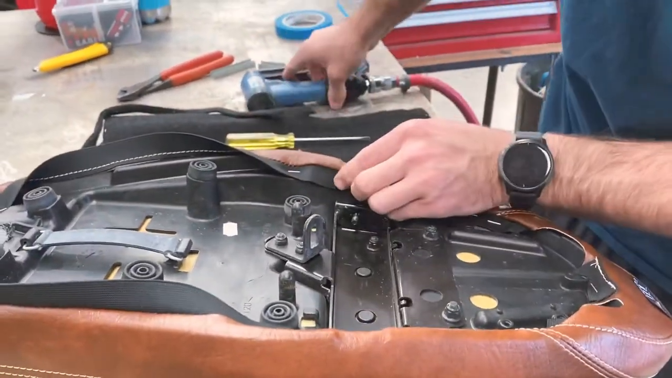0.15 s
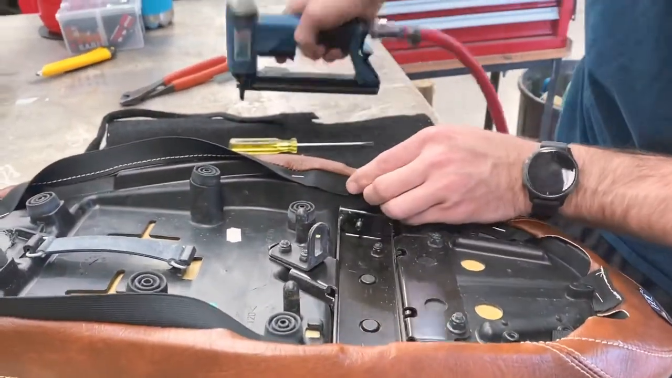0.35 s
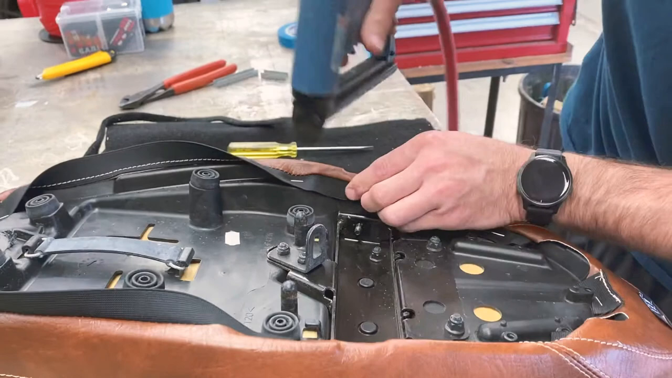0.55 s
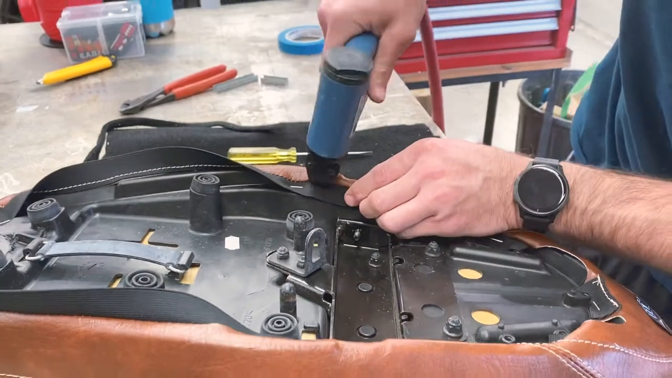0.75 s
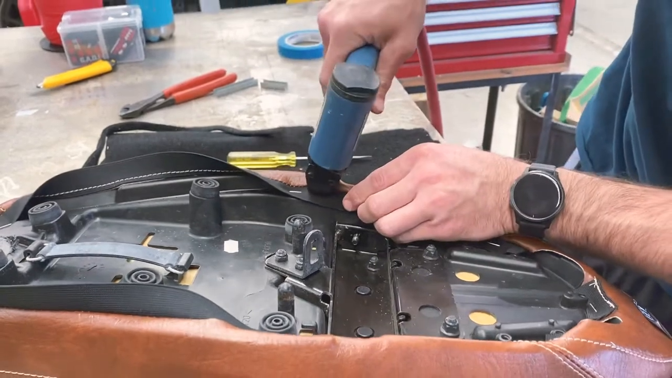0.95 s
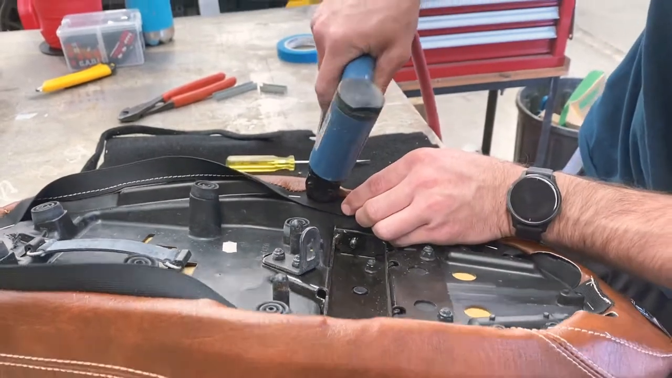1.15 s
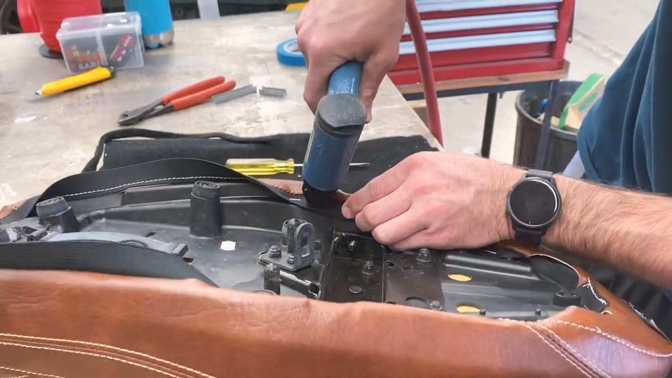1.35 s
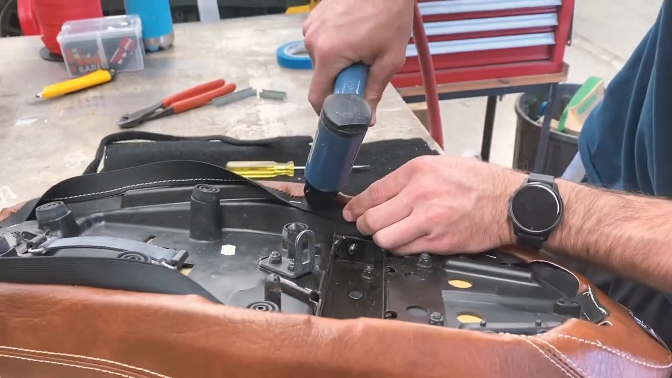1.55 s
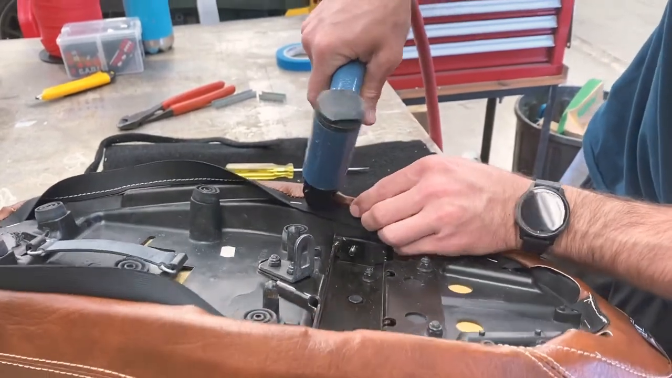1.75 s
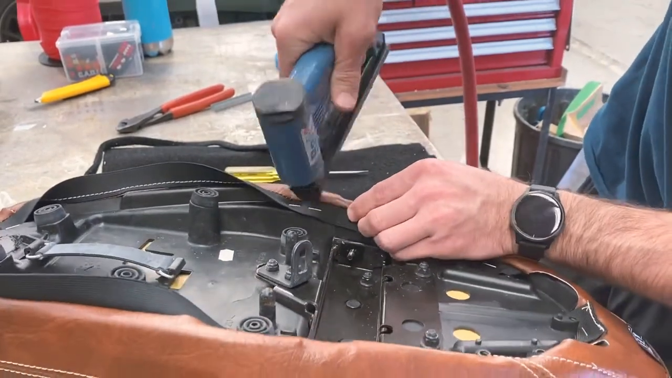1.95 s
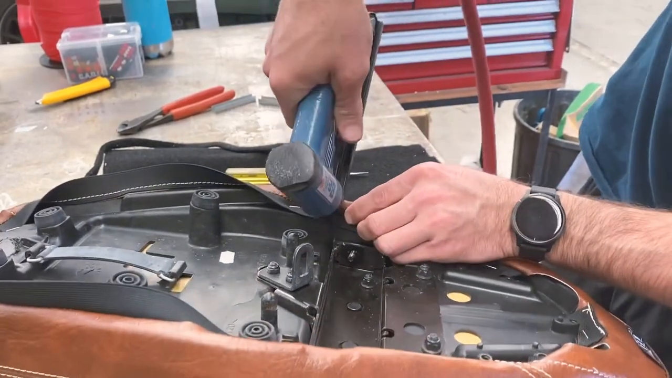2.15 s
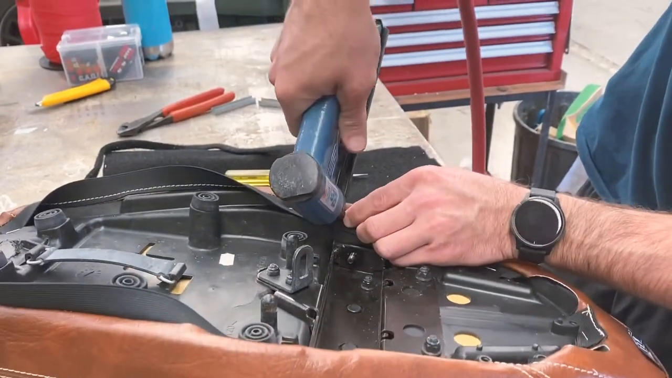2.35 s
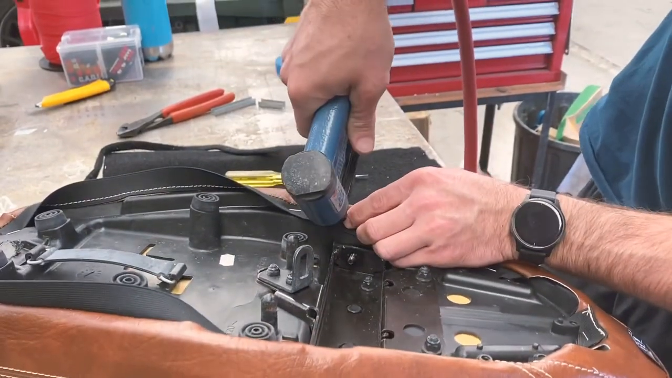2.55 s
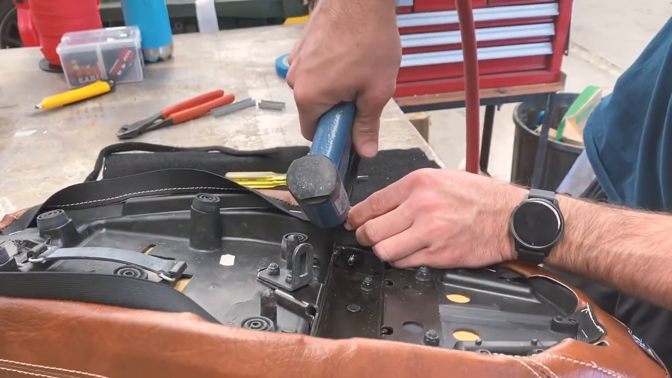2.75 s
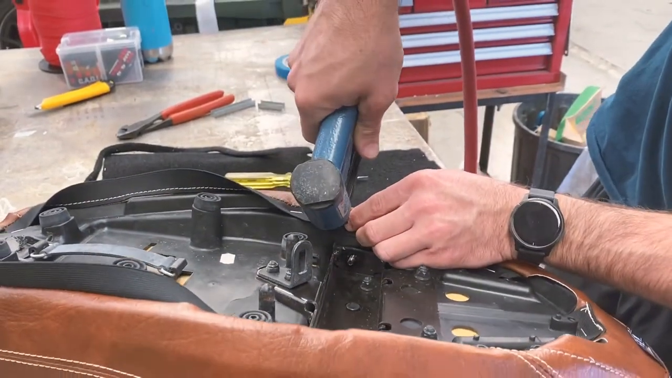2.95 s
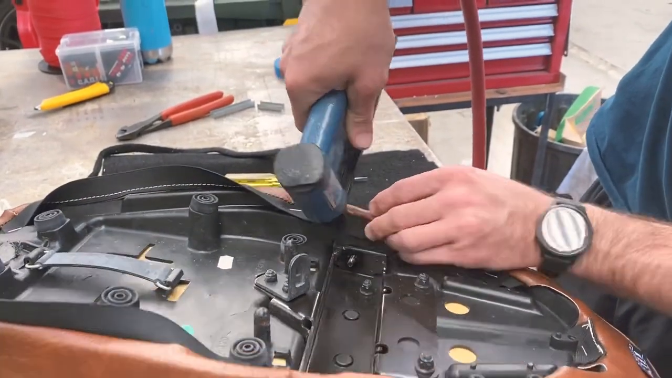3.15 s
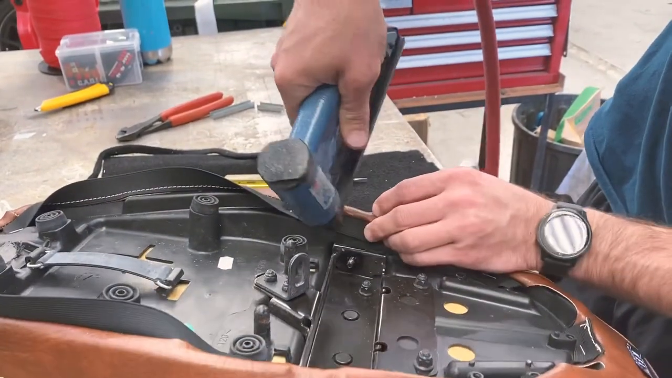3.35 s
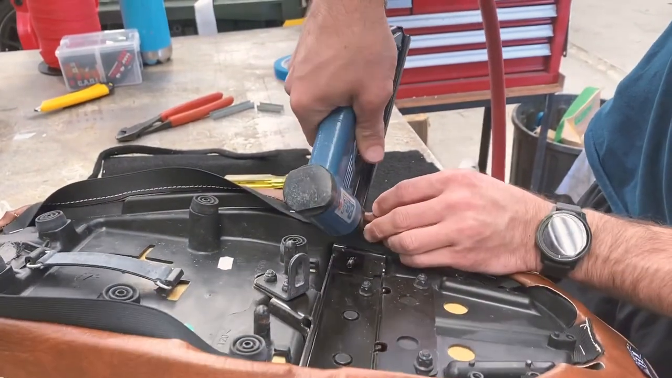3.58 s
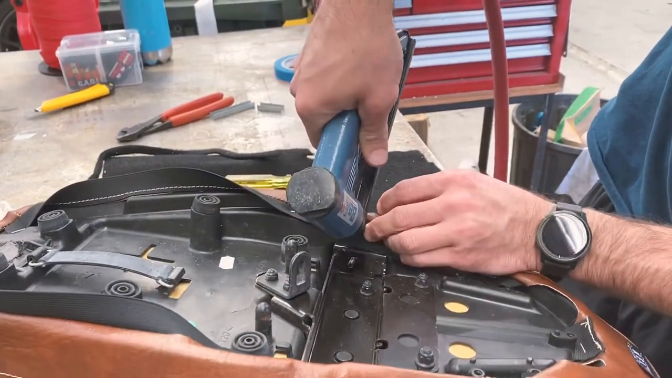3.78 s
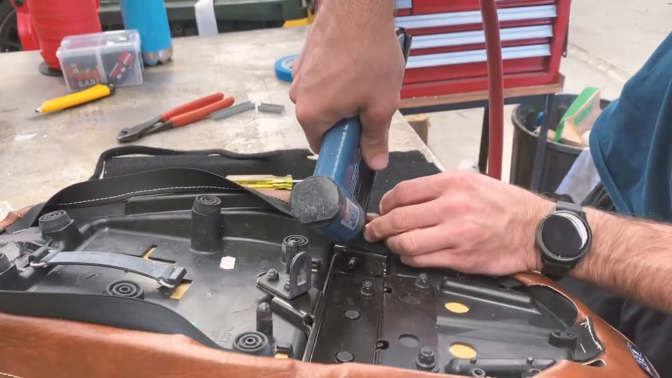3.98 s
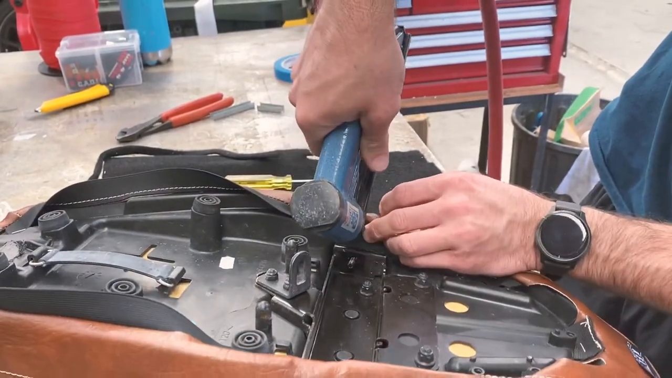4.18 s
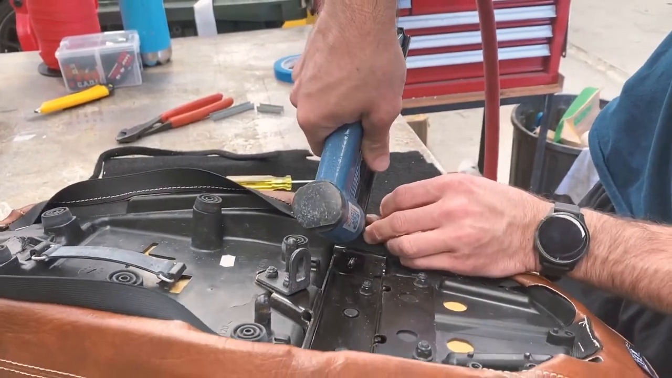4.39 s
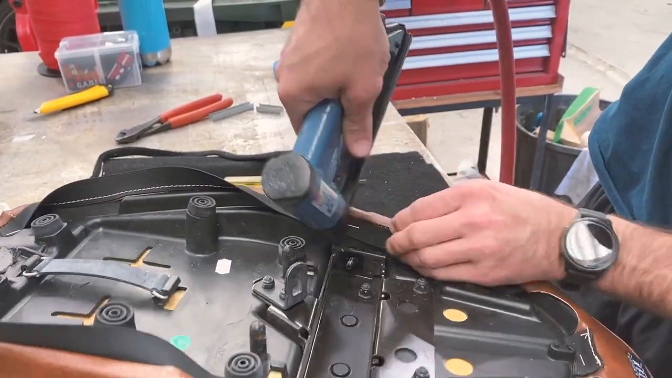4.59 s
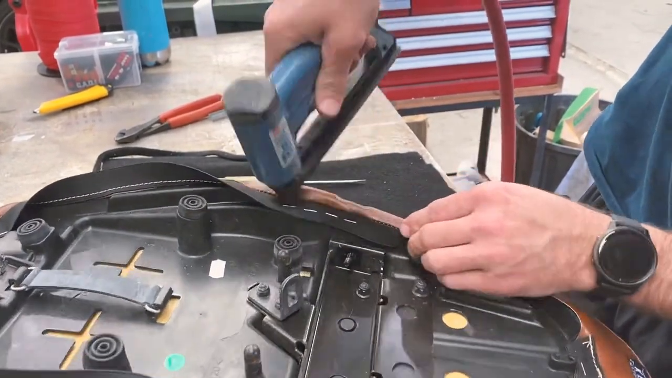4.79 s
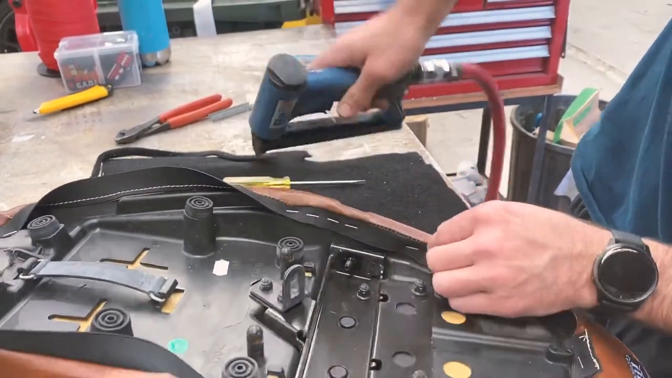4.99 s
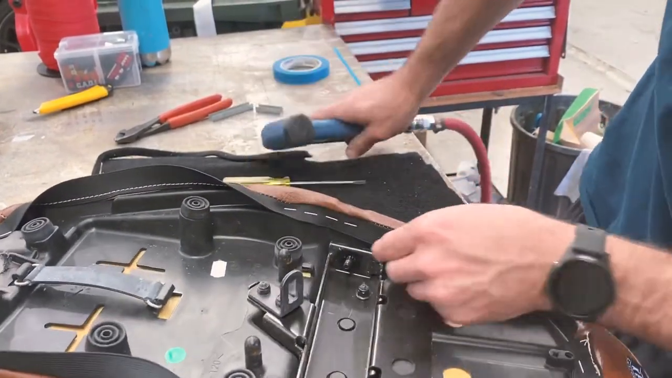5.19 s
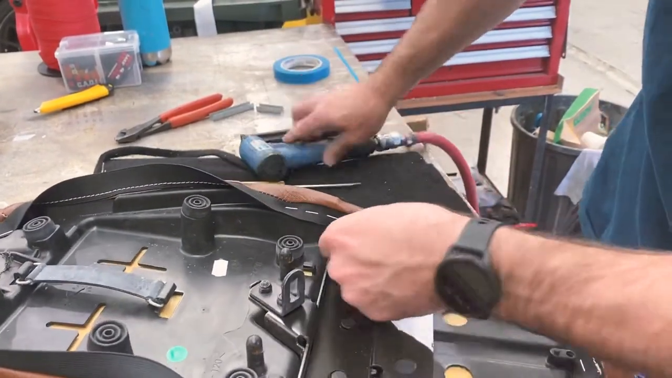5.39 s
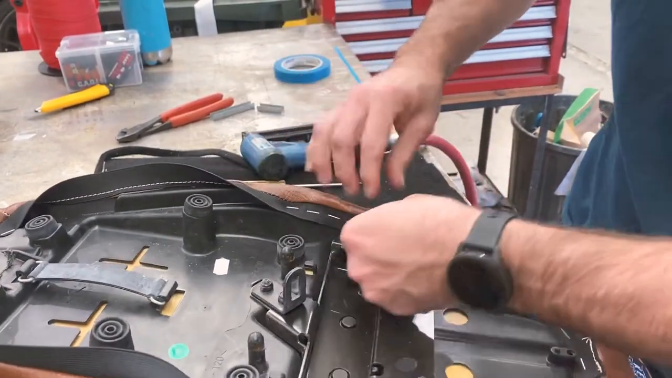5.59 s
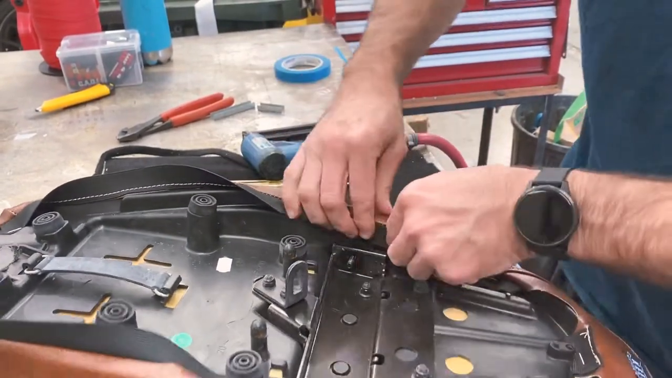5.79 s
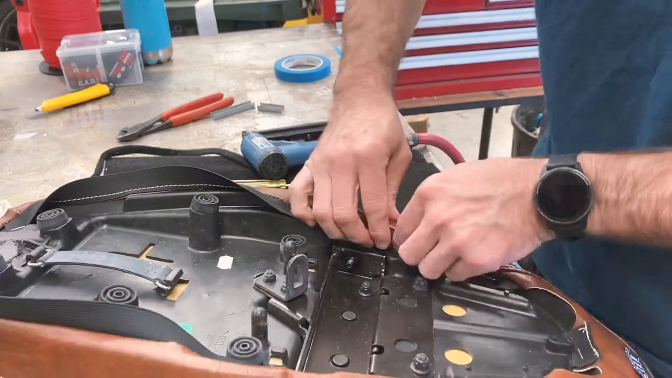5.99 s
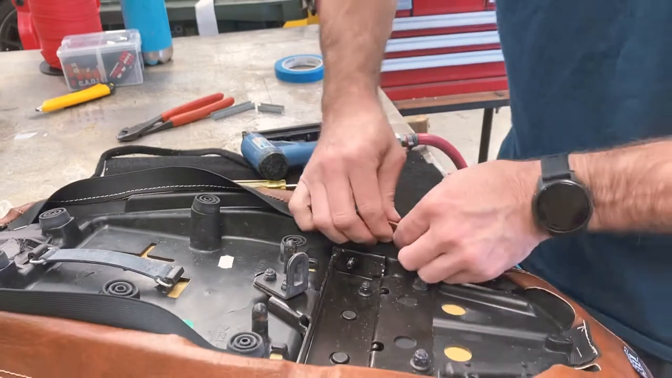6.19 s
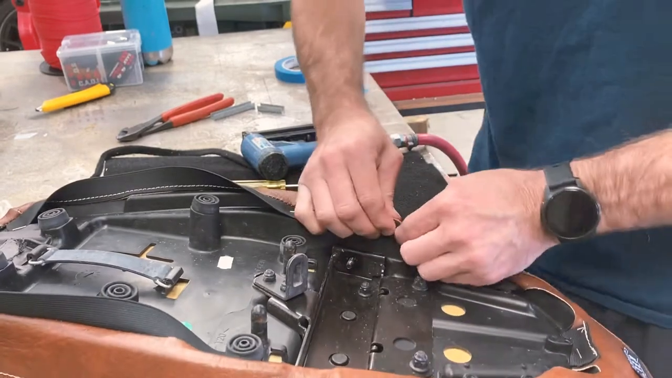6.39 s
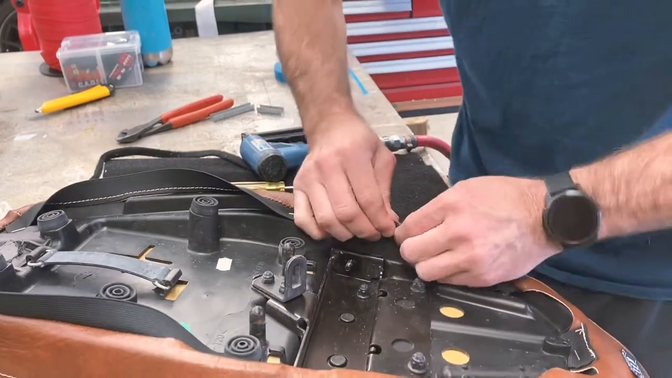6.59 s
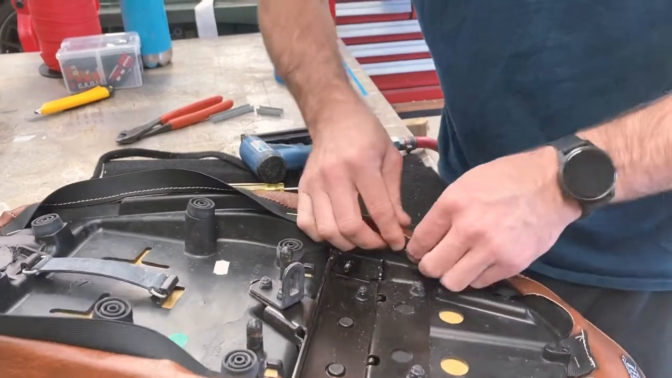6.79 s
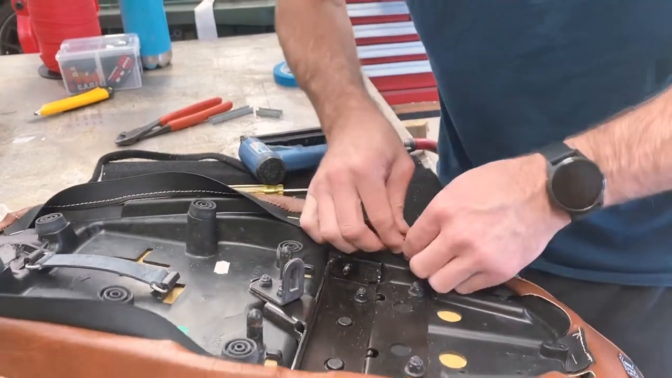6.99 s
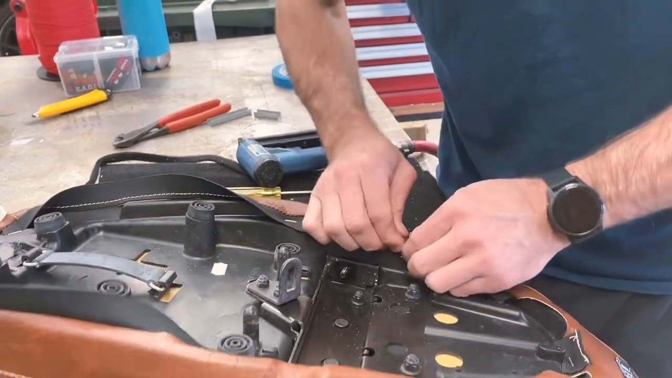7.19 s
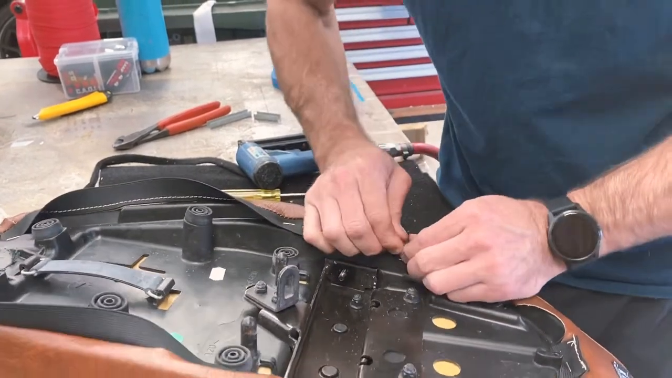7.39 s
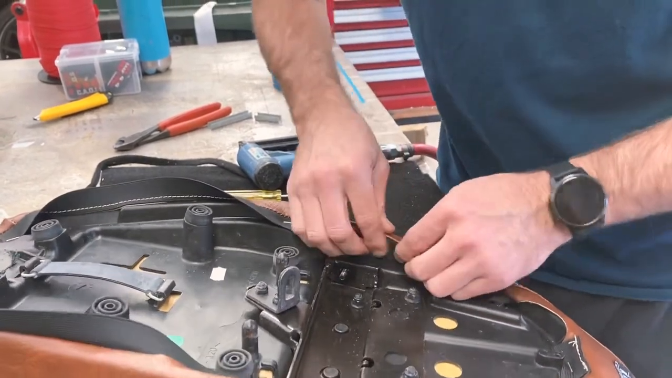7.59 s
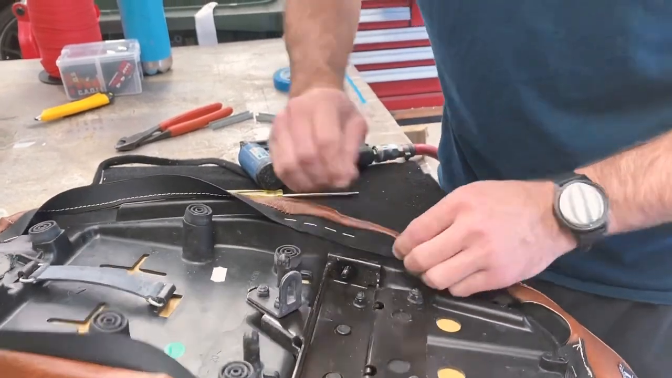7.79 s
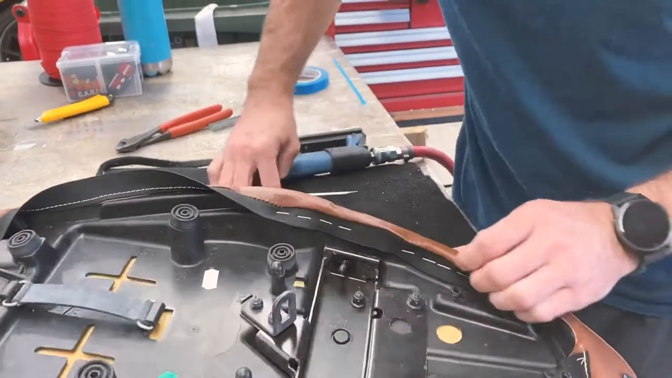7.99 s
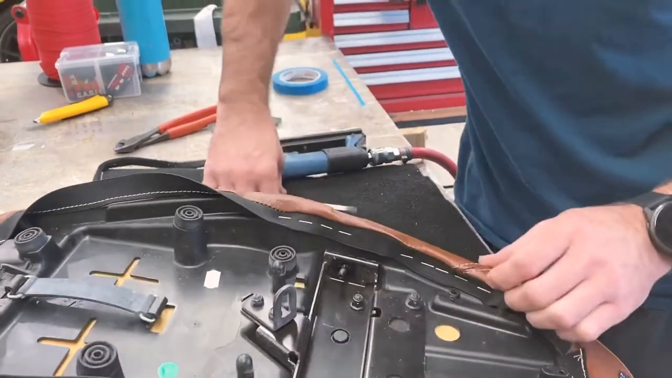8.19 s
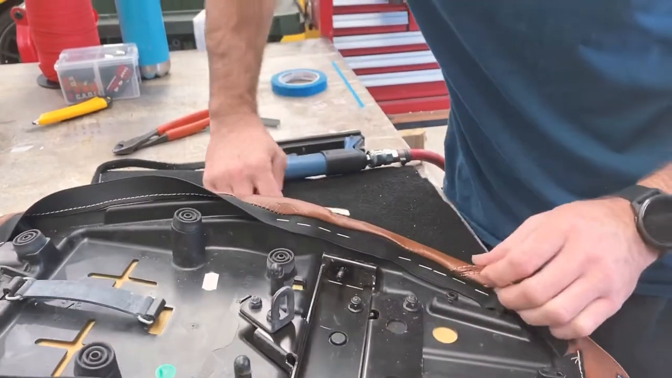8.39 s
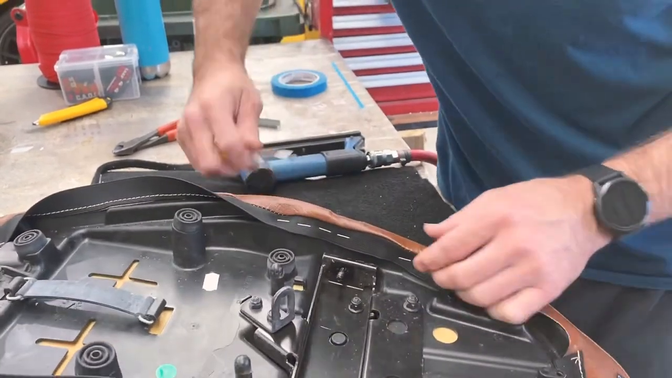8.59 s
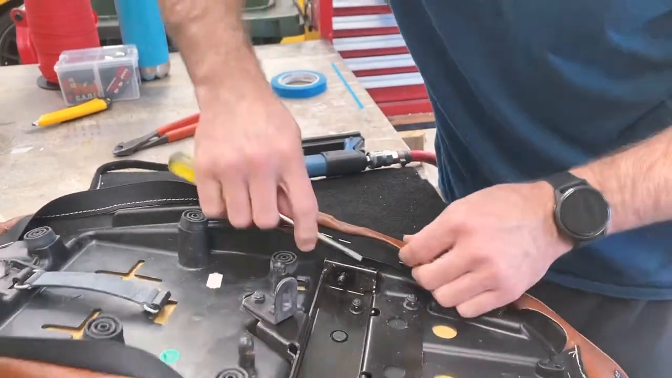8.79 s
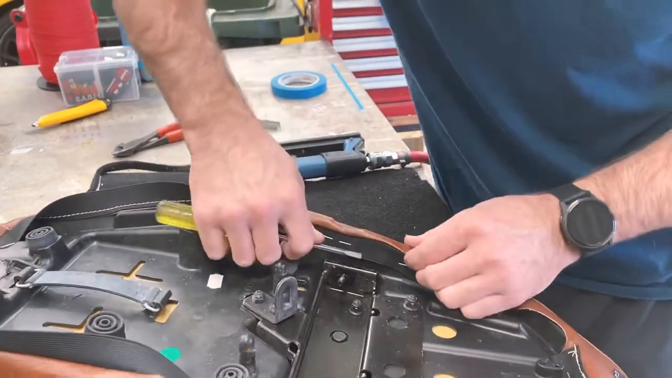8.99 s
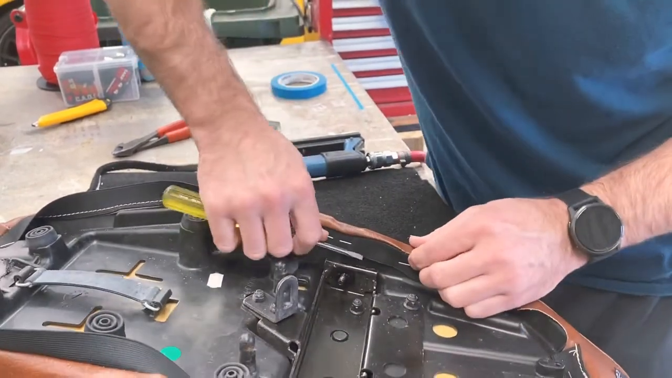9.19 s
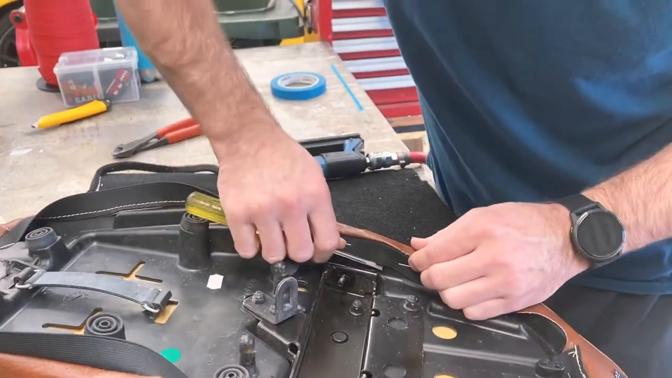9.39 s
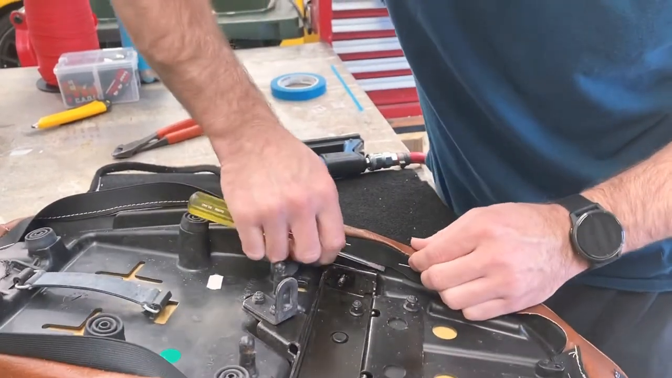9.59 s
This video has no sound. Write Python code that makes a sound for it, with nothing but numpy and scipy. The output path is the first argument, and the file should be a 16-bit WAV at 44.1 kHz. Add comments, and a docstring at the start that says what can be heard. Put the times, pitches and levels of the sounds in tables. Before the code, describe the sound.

A workshop heard close up in stereo, with a faint low drone that sinks in the first few seconds. From 0 to 0.7 seconds a pneumatic stapler knocks, rattles and scrapes off the bench, loudest near 0.26, while hands rub vinyl. At about 1.5, 2.9 and 4.3 seconds it fires: each shot is a spit of air and a rapid cluster of hard metallic cracks with a thud in the plastic seat pan, then about 0.12 seconds later a softer piston clack and a short puff of exhaust. The room rings briefly. Between shots there is only faint rustling. At 5.25 to 5.45 the stapler is laid down with woody knocks and a scrape. Until about 9.6, hands softly rub, crinkle and tuck the vinyl, with little scuffs, dull taps near 7.3, and a clearer tool click around 9.3.

```python
"""First a low building drone, hands on vinyl, and a pneumatic stapler knocking as it leaves the workbench.
It fires three staples through vinyl into a plastic seat pan: each shot is a spit of air, a few hard blows
and, on release, the piston's return with a puff of exhaust. It is laid down, and hands pull and tuck
the vinyl and set a screwdriver to it, close to a small stereo microphone in a ringing workshop.
Noise makes the air, rubs and slides; dying noise bursts through resonant bodies make the contacts."""
import sys
import numpy as np
from scipy import signal
from scipy.fft import rfft, irfft, next_fast_len
from scipy.io import wavfile
from scipy.ndimage import map_coordinates

SR = 44100
rng = np.random.default_rng(int(sys.argv[2]) if len(sys.argv) > 2 else 0)


def wrap_up_sound(samples):
    """Save the sound to the file named by the first command line argument, as 16-bit audio."""
    columns = np.atleast_2d(samples).T
    # keep every value between -1 and 1, then stretch to whole-number steps
    tamed = np.clip(columns, -1, 1)
    steps = np.round(tamed * 32767).astype(np.int16)
    wavfile.write(sys.argv[1], SR, steps)


N = 425565  # samples in the scene
SIZE = 16384  # samples in one contact or body response
T = np.arange(SIZE) / SR
HZ = np.fft.rfftfreq(SIZE, 1 / SR)


def amp(db):
    """Decibels to gain."""
    return 10 ** (np.asarray(db) / 20)


def unit(x):
    """Scale to rms 1."""
    return x / np.sqrt(np.mean(x ** 2) + 1e-20)


def along(points, hz):
    """Read (Hz, value) points on a log frequency axis."""
    f, value = np.transpose(points)
    return np.interp(np.log(hz + 1), np.log(f + 1), value)


def wobble(rate):
    """A smooth random curve, rate knots a second."""
    knots = rng.standard_normal(int(N * rate / SR) + 4)
    return map_coordinates(knots, [np.arange(N) * rate / SR])


def filtered(x, response):
    """Multiply the spectrum of x by a response, a function of Hz."""
    n = x.shape[-1]
    padded = next_fast_len(n + SIZE)
    spectrum = rfft(x, padded) * response(np.fft.rfftfreq(padded, 1 / SR))
    return irfft(spectrum, padded)[..., :n]


def coloured(x, spectrum):
    """Give x a spectrum, at rms 1."""
    return unit(filtered(x, lambda hz: amp(along(spectrum, hz))))


def ripple(hz, depth_db, spacing_hz):
    """Chance peaks and dips over frequency, as nearby surfaces cause."""
    heights = rng.standard_normal(1024)
    return amp(depth_db * map_coordinates(heights, [hz / spacing_hz], mode="mirror"))


def causal(db):
    """The minimum-phase response with these levels, by folding the cepstrum."""
    cepstrum = irfft(np.log(amp(db) + 1e-6))
    cepstrum[1:SIZE // 2] *= 2
    cepstrum[SIZE // 2 + 1:] = 0
    return np.exp(rfft(cepstrum))


def resonances(modes):
    """The response of a body: a sum of damped resonators, each given as (Hz, width Hz, dB)."""
    return sum(amp(db) * 1j * HZ * width / (centre * centre - HZ * HZ + 1j * HZ * width)
               for centre, width, db in modes)


def strike(response, t60, snap):
    """One contact through a response: a clean snap, then dying chatter; rms 1 if packed into 5 ms."""
    chatter = rng.standard_normal((2, SIZE)) * amp(-60 * T / max(t60, .002))
    chatter /= np.linalg.norm(chatter, axis=1, keepdims=True)
    chatter[0, 0] += snap  # the snap is in the middle channel only
    sound = irfft(rfft(chatter) * response)
    sound = sound * (1 - T / T[-1])  # fade to silence
    return sound / np.linalg.norm(sound[0]) * np.sqrt(.005 * SR)


def add(track, s, sound):
    """Mix a sound in at time s."""
    start = max(round(s * SR), 0)
    part = track[:, start:][:, :sound.shape[1]]
    part += sound[:, :part.shape[1]]


# the drone's level, which sinks and then holds: t/s, level/dB
DRONE_LEVEL = [(0, -54), (1, -58), (2.2, -59), (3.9, -68), (5.9, -66), (9.65, -66.5)]
# the drone's relative spectrum: f/Hz, level/dB per Hz
DRONE_SPECTRUM = [(12, -37.5), (20, -6.5), (55, 6), (93, 4), (277, -13.5), (399, -22), (1710, -35.5),
                  (2020, -39), (2260, -40.5), (4810, -48), (6910, -46.5), (9140, -57), (11400, -51.5),
                  (16000, -63)]


def rumble():
    """The low drone of the building: coloured noise under a slow level curve."""
    level_db = np.interp(np.arange(N) / SR, *np.transpose(DRONE_LEVEL))
    return amp(level_db) * coloured(rng.standard_normal((2, N)), DRONE_SPECTRUM)


GRIP_S = .035  # a spell fades in and out over about this time


def spell(start, end, now):
    """A gain that rises at start, holds, and falls at end."""
    return (np.tanh((now - start) / GRIP_S) - np.tanh((now - end) / GRIP_S)) / 2


# spells of hands on the vinyl: start t/s, end t/s, rub level/dB, crinkle level/dB, both before the grip
HANDLING_SPELLS = [(0, 0.805, -75.5, -83), (0.799, 1.337, -79, -93.5), (2.045, 2.599, -80, -89.5),
                   (3.494, 4.2, -97.5, -102), (4.751, 5.252, -82.5, -87), (5.25, 5.882, -75, -81),
                   (5.878, 6.45, -80, -88), (6.621, 7.334, -82, -90.5), (7.498, 8.35, -81, -88),
                   (8.454, 8.85, -91.5, -90), (8.851, 9.369, -79, -90)]


def handling(now):
    """The gains of rub and of crinkle at these times, summed over the spells."""
    return sum(amp([[rub], [crinkle]]) * spell(start, end, now)
               for start, end, rub, crinkle in HANDLING_SPELLS)


# relative spectrum of skin rubbing on vinyl: f/Hz, level/dB per Hz
RUB_SPECTRUM = [(100, -13.5), (350, 8), (700, 2), (1400, 1), (2500, -9), (4500, -20), (12000, -32)]
# relative spectrum of the crackling folds: f/Hz, level/dB per Hz
CRINKLE_SPECTRUM = [(800, -25), (2800, 7), (4800, -1.5), (7500, -2), (11500, -1.5), (13500, -21),
                    (16000, -28)]


def vinyl():
    """Skin rubs over the vinyl in uneven strokes, and its folds give off tiny crackles of random strength."""
    rub_gain, crinkle_gain = handling(np.arange(N) / SR)
    grip = amp(2.2 * wobble(28) + 1.5 * wobble(7))
    crackles = rng.standard_normal((2, N))
    crackles = crackles * (rng.random(N) < 2500 / SR)  # about 2500 a second
    crackles = crackles * amp(1.2 * rng.exponential(size=N).clip(0, 5))
    rub = rub_gain * coloured(rng.standard_normal((2, N)), RUB_SPECTRUM)
    crinkle = crinkle_gain * coloured(crackles, CRINKLE_SPECTRUM)
    return grip * (rub + crinkle)


def slides(rows):
    """Each slide is a swell of tiny slips, ringing around the pitch of the surface."""
    out = np.zeros((2, N))
    t = np.arange(SR) / SR - .5  # the swell peaks half a second into its buffer
    for s, length, db, centre_hz, octaves in rows:
        slips = rng.standard_normal((2, SR)) * (rng.random(SR) < 1800 / SR)

        def band(hz):
            distance = np.log2((hz + 1) / centre_hz) / octaves
            return ripple(hz, depth_db=1.5, spacing_hz=184.07) / (1 + distance ** 2) ** 1.5

        swell = np.exp(-2 * (t / length) ** 2)
        add(out, s - .5, amp(db) * swell * unit(filtered(slips, band)))
    return out


SCUFFS_PER_S, SCUFF_S, SCUFF_HZ = 11, .0069, 1400  # rate; typical length and pitch
SCUFF_DB = .5  # typical level over the rub


def scuffs(spread_db=3, octaves=1.2):
    """Fingertips scuff at chance moments while the hands work: brief slides, stronger when they rub harder."""
    rows = []
    for start, end, rub_db, _ in HANDLING_SPELLS:
        count = round((end - start) * SCUFFS_PER_S)
        times = rng.uniform(start, end, count)
        variations = rng.standard_normal((count, 3)).clip(-2, 2)
        for s, (long, loud, high) in zip(times, variations):
            length = SCUFF_S * 2 ** (long / 2)
            db = rub_db + SCUFF_DB + spread_db * loud
            rows.append((s, length, db, SCUFF_HZ * 2 ** (high / 2), octaves))
    return slides(rows)


# relative spectrum of loose clatter: f/Hz, level/dB per Hz
CLATTER_SPECTRUM = [(100, -2.5), (500, 0), (1000, 1.5), (2100, -1), (3300, -6), (7000, -1.5), (11500, -11),
                    (16000, -18)]


def contacts(rows, modes, ring, clatter_t60, thud_t60):
    """Each contact clicks with the tool's ring and thuds in the modes nearest the pitch of the spot it lands on."""
    out = np.zeros((2, N))
    body = resonances(modes)
    upper = np.clip(np.log2((HZ + 1) / 2500), 0, 1)  # the treble setting acts fully above 5 kHz
    for s, click_db, thud_db, thud_hz, treble_db in rows:
        colour = ring * causal(along(CLATTER_SPECTRUM, HZ) + upper * treble_db)
        spot = causal(-6.5 * np.abs(np.log2((HZ + 20) / thud_hz)))  # 6.5 dB per octave
        add(out, s, amp(click_db) * strike(colour, clatter_t60, snap=.31))
        add(out, s, amp(thud_db) * strike(body * spot, thud_t60, snap=.84))
    return out


# modes of the bench top: f/Hz, width f/Hz, relative level/dB
BENCH_MODES = [(66, 17, -16), (90, 14, 17), (146, 60, 7.5), (227, 34, -1), (279.6, 27, 3.5), (340, 37, 6),
               (494.3, 130, 3.5), (564.8, 14, -3.5), (666, 31, -9)]
# the stapler knocks on the bench, and at .575 s is dragged briefly across it: t/s, click level/dB, thud
# level/dB, thud f/Hz, click treble level/dB
BENCH_KNOCKS = [(.035, -53, -39, 92, -19), (.149, -47.5, -34, 85, -11), (.212, -51.5, -33, 167, -3.5),
                (.257, -29.5, -32.5, 388, -9.5), (.428, -55, -56, 85, -28), (.575, -54, -40, 600, -10),
                (5.253, -40, -30.5, 323, -5.5), (5.366, -58.5, -39, 272, -13), (5.42, -39.5, -32.5, 480, 0),
                (5.449, -57, -35, 78, -9)]
ROCK_S, ROCK_CLICK_DB, ROCK_THUD_DB, ROCK_PITCH = .014, -9.5, -4, .45  # later, softer, deeper (pitch ratio)


def knocks(duller_db=-10):
    """The stapler meets the bench with one end, then rocks onto the other with a looser rattle; its short drag
    at .575 s is played the same way."""
    casing = resonances([(1920, 340, .5), (1130, 320, -7)]) + amp(-7.5)
    rocks = [(s + ROCK_S, click_db + ROCK_CLICK_DB, thud_db + ROCK_THUD_DB, hz * ROCK_PITCH, treble + duller_db)
             for s, click_db, thud_db, hz, treble in BENCH_KNOCKS]
    first_end = contacts(BENCH_KNOCKS, BENCH_MODES, casing, clatter_t60=.02, thud_t60=.092)
    other_end = contacts(rocks, BENCH_MODES, casing, clatter_t60=.091, thud_t60=.11)
    return first_end + other_end


# hands and tools slide over bench and vinyl: middle t/s, length t/s, level/dB, centre f/Hz, width/octaves
HAND_SLIDES = [(.595, 0.036, -51.5, 614, 1.22), (.64, .11, -58, 530, 0.93), (1.19, 0.1, -76.5, 2160, 2.3),
               (2.316, 0.28, -80.5, 4885, .5), (2.48, 0.064, -67.5, 525.4, 0.71),
               (4.01, .025, -82, 903, .9), (4.934, .022, -73, 2815, 2.4), (5.03, 0.016, -82, 2500, 1.2),
               (5.103, 0.017, -70, 5980, 3.6), (5.383, 0.024, -51, 1100, 1.02),
               (5.435, .02, -46.5, 1000, 0.99), (5.592, 0.011, -62.5, 2010, 0.96),
               (6.178, 0.042, -67, 1400, 1.1), (6.39, 0.1, -76, 1141, 0.5),
               (6.675, 0.036, -61.5, 940, 1.65), (7.05, 0.036, -73.5, 1240, 0.75),
               (7.517, .029, -70.5, 1281, 1.13), (7.588, 0.041, -69, 6500, 1.5),
               (7.6, 0.034, -63.5, 1180, 1.7), (7.829, .04, -72, 460, 0.47), (7.95, 0.098, -72, 2300, 0.98),
               (8.25, 0.25, -90.5, 4763, .35), (8.5, 0.034, -67.5, 2600, .7), (8.685, .035, -78, 2300, 1.6),
               (9.13, 0.024, -75.5, 1590, 1.45), (9.24, 0.061, -72, 2170, 0.98),
               (9.616, 0.046, -74.5, 1570, 1.04)]


def hand_slides():
    """Hands and tools drag over bench and vinyl, each drag a swell of slips."""
    return slides(HAND_SLIDES)


# modes of the plastic seat pan: f/Hz, width f/Hz, relative level/dB
PAN_MODES = [(62.67, 18, -8.5), (92, 50, 0.5), (133.88, 95, 5), (176, 360, -4.5), (300, 83, -5),
             (456, 82, -15), (1000, 74, -18.5)]
# fingers and tools tap the seat: t/s, click level/dB, thud level/dB, thud f/Hz, click treble level/dB
SEAT_TAPS = [(.719, -53.5, -51.5, 110, -12.5), (2.132, -52, -50, 81, -8.5), (3.588, -70, -52, 89, 1),
             (4.819, -67, -47.5, 100, 2), (4.891, -78, -42, 121, -4), (5.666, -62, -46.5, 80, -7),
             (5.729, -64, -55, 55, -12.5), (6.083, -75.5, -62.5, 260, -5.5), (6.182, -61.5, -61, 81.1, 14),
             (6.657, -61.5, -54.5, 496, 0), (6.732, -64.5, -54, 442, -8), (6.785, -66.5, -60, 86, -4.5),
             (7.264, -60, -46, 360, -16), (7.281, -58, -45, 44.95, -8), (7.298, -59.5, -45.5, 40, -30),
             (7.476, -58, -58, 78, -12), (7.951, -63, -54.5, 351, -14), (7.999, -65, -53.5, 363.4, -29),
             (8.582, -80, -52.5, 460, -19), (8.87, -59, -62, 126.3, -15), (8.891, -67, -53, 101, -5),
             (8.924, -51.5, -57, 70, -14), (8.965, -65, -51, 166.7, -22.5), (9.269, -39.5, -49, 340, -17.5)]


def taps():
    """Fingers and tools tap the seat: a click with a tool's ring and a short thud of the pan."""
    tool = resonances([(1250, 430, 0), (2340, 130, -.64), (3400, 920, -2)]) + amp(-7.5)
    return contacts(SEAT_TAPS, PAN_MODES, tool, clatter_t60=.018, thud_t60=.026)


# one row per staple: t/s, blow level/dB, first blow's extra bite/dB, tilt/dB per octave (added to each blow's),
# push on the seat/dB, spot f/Hz, spit level/dB, trigger held t/s, piston return level/dB, exhaust length t/s
STAPLE_SHOTS = [(1.547, -13.5, -10, -1, -24.5, 211.5, -27.5, .1188, -37.5, .18),
                (2.897, -16, 3, 1, -27, 201.1, -23.5, .1208, -32.5, .12),
                (4.2939, -14.5, -6.5, -0.06, -20, 130, -30.5, .1171, -33.5, .16)]
# relative spectrum of the air spit: f/Hz, level/dB per Hz
SPIT_SPECTRUM = [(200, -16), (1500, 4.5), (4000, -3.5), (7000, -3), (9000, 1), (11500, -0.5), (15500, -8.5)]
# relative spectrum of the exhaust, before ripple: f/Hz, level/dB per Hz
EXHAUST_SPECTRUM = [(200, -24.5), (600, -11), (1200, -1.5), (2500, 1.5), (4500, 2), (7000, -10),
                    (11000, -19.5), (16000, -33)]
SPIT_LEAD_S, EXHAUST_DB = .004, -49.5  # the valve opens just before the drive; the air let out on release


def air(lead=.03, spit_length=.0022, onset_db=-14, onset_length=.0065):
    """Air spits as the valve opens; on release the cylinder empties through the exhaust."""
    out = np.zeros((2, N))
    t = np.arange(SR) / SR

    def jet(spectrum):
        return coloured(rng.standard_normal((2, SR)), spectrum)

    def swell(length):
        return 1 / (1 + ((t - lead) / length) ** 4)

    for s, _, _, _, _, _, spit_db, held, _, exhaust_length in STAPLE_SHOTS:
        spit = swell(spit_length) * jet(SPIT_SPECTRUM)
        # a softer, longer noise swell around the spit
        onset = amp(onset_db) * swell(onset_length) * jet(CLATTER_SPECTRUM)
        add(out, s - SPIT_LEAD_S - lead, amp(spit_db) * (spit + onset))
        flow = (1 - np.exp(-t / .004)) / (1 + (t / exhaust_length) ** 4)
        puff = filtered(jet(EXHAUST_SPECTRUM), lambda hz: ripple(hz, depth_db=2.0, spacing_hz=70))
        add(out, s + held, amp(EXHAUST_DB) * flow * unit(puff))
    return out


# modes of the stapler's body: f/Hz, width f/Hz, relative level/dB
STAPLER_MODES = [(1147.3, 260, -3.5), (2150, 110, -12), (3680, 170, -8), (4320, 130, -6), (5180, 300, -8),
                 (6750, 60, -15.5), (6700, 160, -7.5), (7240, 97, -13.5), (10417, 390, -16.5),
                 (11200, 220, -11), (10793, 98, -13.5), (14900, 100, -17.5)]
# relative spectrum of the driver's crack, before tilt: f/Hz, level/dB per Hz
CRACK_SPECTRUM = [(100, -20), (400, -3), (1100, 1.5), (2500, 0.5), (5000, -8.5), (7200, -7.5), (9000, -15),
                  (11400, -8), (13500, -16), (16000, -20.5)]
# relative spectrum of the piston's knock inside the casing, before tilt: f/Hz, level/dB per Hz
PISTON_SPECTRUM = [(100, -20.5), (600, -9.5), (1100, -0.5), (1900, 6.5), (3000, -1.5), (5000, -11),
                   (7200, -6.5), (9000, -15), (11400, -9), (16000, -21.5)]
# every drive: the driver meets the staple, pierces the pan, bottoms out, and the tool recoils:
# t/s after firing, relative level/dB, tilt/dB per octave, clatter t60/s, relative push/dB
DRIVE_BLOWS = [(0, -0.5, 0.5, .016, -4.5), (.003, 0, 0, 0.011, 1.5), (.0059, -2, 0.5, .011, 0),
               (.0165, -15, -4, .038, -14)]
# every return: the piston hits its stop, seats and rebounds:
# t/s after release, relative level/dB, tilt/dB per octave, clatter t60/s, relative push/dB
RETURN_BLOWS = [(0, 2.5, -0.5, .018, 3.5), (.004, -2, 2, 0.034, 3), (.0165, -3.5, 0, .028, 4.5)]
SPOT_DB_PER_OCTAVE = -2  # a push favours the modes near the pitch of the spot


def blows(bench_db=-12, cushion_hz=420):
    """The driver cracks through the stapler's body and shoves the pan onto the bench; the piston knocks back."""
    out = np.zeros((2, N))
    body = resonances(STAPLER_MODES) + amp(-7)
    support = resonances(PAN_MODES) + amp(bench_db) * resonances(BENCH_MODES)
    octaves = np.log2(np.clip(HZ, 700, 12000) / 2500)  # tilt pivots at 2.5 kHz
    # the return reaches the seat softly, through the vinyl
    cushion = causal(-10 * np.log10(1 + (HZ / cushion_hz) ** 4))

    def blow(s, db, spectrum, tilt, t60, push_db, spot):
        colour = causal(along(spectrum, HZ) + (tilt + 1) * octaves)  # every blow has 1 dB per octave more
        add(out, s, amp(db) * strike(body * colour, t60, snap=.38))
        add(out, s, amp(push_db) * strike(support * spot, t60, snap=1.2))

    for s, level, bite, bright, push, spot_hz, _, held, return_db, _ in STAPLE_SHOTS:
        spot = causal(SPOT_DB_PER_OCTAVE * np.abs(np.log2((HZ + 20) / spot_hz)))
        for k, (after, db, tilt, t60, push_db) in enumerate(DRIVE_BLOWS):
            blow_db = level + db + bite * (k == 0)
            blow(s + after, blow_db, CRACK_SPECTRUM, bright + tilt, t60, push + push_db, spot)
        for after, db, tilt, t60, push_db in RETURN_BLOWS:
            blow(s + held + after, return_db + db, PISTON_SPECTRUM, tilt, t60, return_db + push_db, spot * cushion)
    return out


# tone of the echo from walls and near surfaces: f/Hz, level/dB
ECHO_TONE = [(60, -3), (200, 0), (500, -4), (1200, -5), (2500, -5.5), (4500, -1), (7500, -10.5),
             (11000, -15), (16000, -18.5)]


def nearby(x, t60):
    """Dense early reflections from the bench and the tools on it: decaying noise that builds up over 4.5 ms."""
    scatter = rng.standard_normal((2, SIZE)) * amp(-60 * T / t60) * (1 - np.exp(-T / .0045))
    scatter = filtered(scatter / np.linalg.norm(scatter[0]), lambda hz: amp(along(ECHO_TONE, hz)))
    return signal.fftconvolve(x[:1], scatter, axes=1)[:, :N]


# how long the workshop rings: f/Hz, t60/s
ROOM_DECAY = [(100, 1.0), (500, 0.35), (1500, 0.59), (4500, 0.65), (8000, 0.76), (15000, 0.68)]


def room(x, gap=.009, size=30000):
    """The workshop's diffuse answer: a fresh random tail for every size samples; each frequency dies at its own speed."""
    out = np.zeros((2, N))
    for start in range(0, N, size):
        hz, t, z = signal.stft(rng.standard_normal((2, SR)), SR, nperseg=256)
        decay = amp(-60 * t / along(ROOM_DECAY, hz)[:, None])
        tail = signal.istft(z * decay, SR, nperseg=256)[1]
        tail = tail / np.linalg.norm(tail[0])
        add(out, start / SR + gap, signal.fftconvolve(x[:1, start:start + size], tail, axes=1))
    return filtered(out, lambda hz: amp(along(ECHO_TONE, hz)))


# stereo width, as gain on the side channel: f/Hz, level/dB
SIDE_LEVEL = [(100, -19), (300, -10.5), (700, -4), (2500, -4.5), (4500, -5.5), (7000, -11.5),
              (15000, -12.5)]


def scene():
    """Sources in mid and side, then left and right; the bench is farther off, so wetter; surfaces colour the handling."""
    stapler = blows() + air()  # right by the microphone, so its echo is weak
    bench = knocks()
    seat = taps()
    drone = rumble()
    hands = vinyl() + hand_slides() + scuffs()
    wet = room(amp(-13.5) * stapler + amp(-8.5) * bench + amp(-15) * (seat + hands))
    early = nearby(amp(-19.5) * stapler + amp(-8.5) * bench + amp(-5.0) * seat, t60=.076)

    def surfaces(hz):
        return ripple(hz, depth_db=2.0, spacing_hz=172.6) ** np.clip(hz / 500, 0, 1)  # little ripple in the bass

    handled = filtered(bench + seat + hands, surfaces)
    mid, side = stapler + handled + wet + early + drone
    side = filtered(side, lambda hz: amp(along(SIDE_LEVEL, hz)))
    balance = amp(np.array([[1], [-1]]) * .25)  # left slightly louder
    return np.array([mid + side, mid - side]) * balance


# phase between the microphone's two channels: f/Hz, phase/radians
CHANNEL_PHASE = [(300, 0), (620, .7), (1100, 0), (1900, .1), (2700, 1.2), (4000, 0), (7300, -.1),
                 (8900, -3.1), (10700, -6.2), (11500, -6.4), (13200, -9.4), (15000, -12.5)]
TOP_HZ = 16300  # upper band limit


def record(dry, lag=.0088, knee_hz=340):
    """The microphone delays the bass, turns the treble's phase between channels, rounds peaks and limits the band."""
    def delay(hz):
        return np.exp(-2j * np.pi * lag * knee_hz * np.arctan(hz / knee_hz))  # lag in s, shrinking above the knee

    def turn(hz):
        return np.exp(.5j * np.array([[1], [-1]]) * np.interp(hz, *np.transpose(CHANNEL_PHASE)))

    def low_cut(hz):
        return hz / np.hypot(hz, 32)

    x = filtered(dry, lambda hz: delay(hz) * turn(hz) * low_cut(hz))
    x = x / (1 + np.abs(x / .95) ** 6) ** (1 / 6)  # soft limit at .95
    return filtered(x, lambda hz: 1 / (1 + (hz / TOP_HZ) ** 120))


dry = scene()
out = record(dry)
wrap_up_sound(out)
```